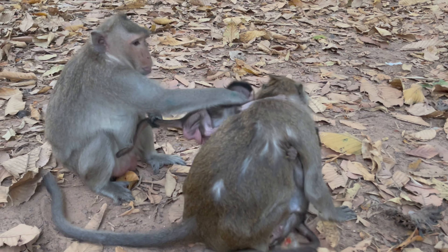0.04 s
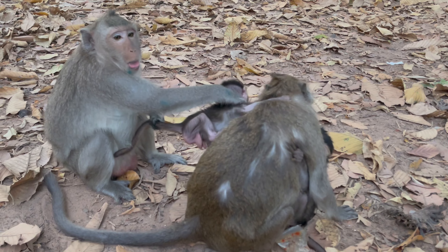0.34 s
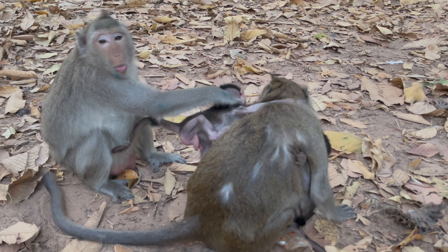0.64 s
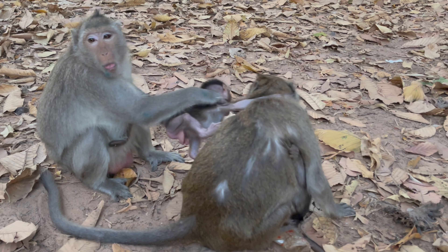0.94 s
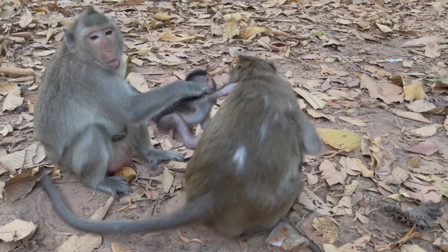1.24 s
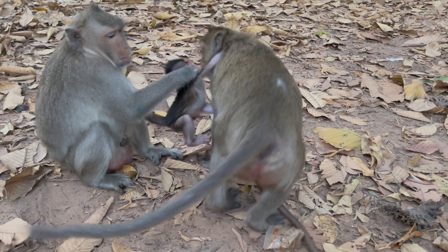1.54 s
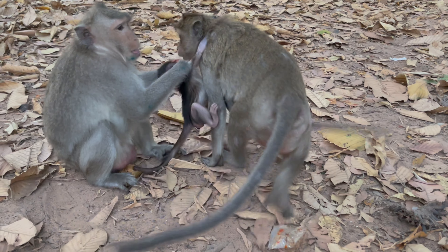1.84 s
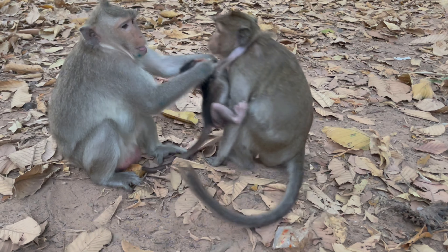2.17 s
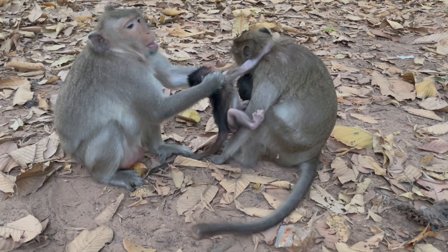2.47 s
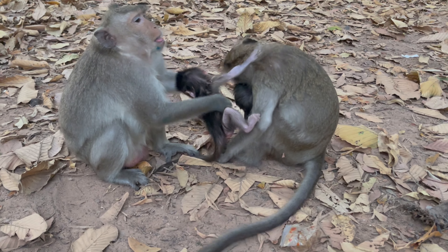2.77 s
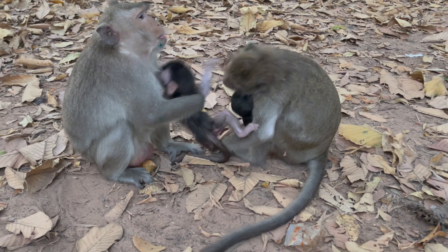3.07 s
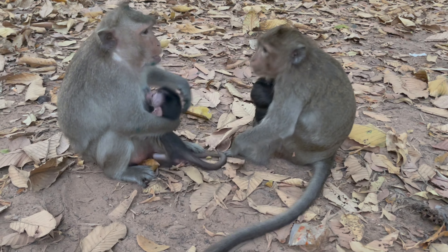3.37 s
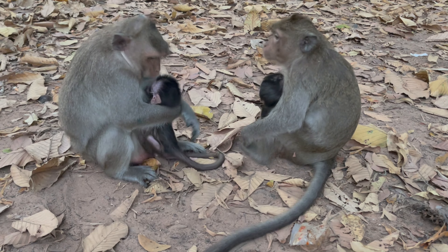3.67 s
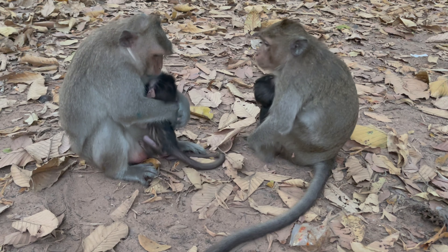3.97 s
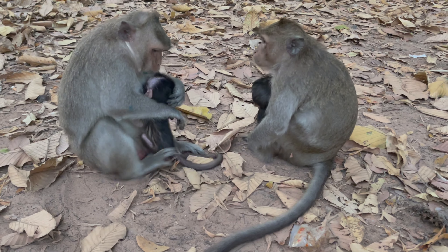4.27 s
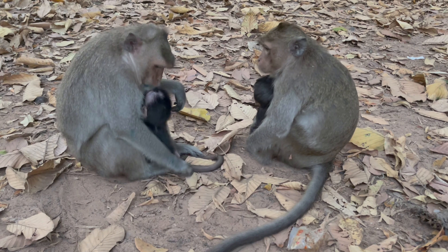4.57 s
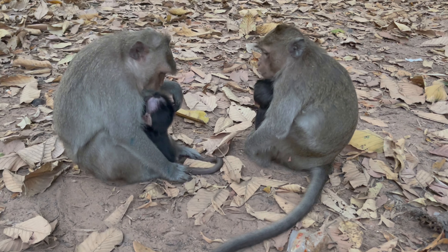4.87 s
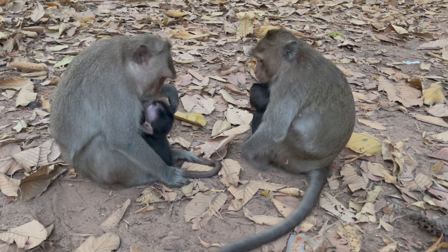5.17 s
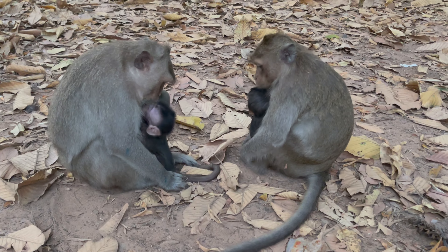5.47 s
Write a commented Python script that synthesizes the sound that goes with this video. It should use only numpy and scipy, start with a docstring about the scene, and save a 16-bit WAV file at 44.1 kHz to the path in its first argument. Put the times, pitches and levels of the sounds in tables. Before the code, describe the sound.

A high, steady whine and hiss of cicadas fills a forest throughout, over the low rumble of distant traffic. The whole scene is fairly quiet. At the very start there is one tiny grunt, then faint, far hoots. At about 1.1 seconds a monkey close by gives three soft, low, rough grunts in quick succession. Dry leaves crackle and small stalks snap under the animals from 1 to 2.2 seconds. A small bird chips a quick, high, slightly echoing trill from about 1.8 to 2.7 seconds. Another faint hoot comes near 2.9 seconds, followed by brief rustles. Short runs of stuttering, throaty grunts come at 3.3 and 3.9 seconds, then a crackle and snap at 4.3. The strongest run of grunts falls around 4.9 to 5 seconds. One last bird chip sounds near 5.7 seconds as the insects and traffic carry on.

```python
"""Macaques give short runs of low, rough, stuttering grunts, close by in a forest.
Each grunt is a few slaps of the vocal folds that ring the throat and mouth. Dry leaves crackle
under the animals, a small bird chips a high trill, and something hoots far off. All around,
cicadas click so fast that they whine, over the rumble of distant traffic."""
import sys
import numpy as np
from scipy import signal
from scipy.fft import rfft, irfft
from scipy.io import wavfile
from scipy.ndimage import uniform_filter1d

SR = 44100
rng = np.random.default_rng(int(sys.argv[2]) if len(sys.argv) > 2 else 0)


def to_wav(sig):
    """Store sig (one row per channel, or 1-D mono) as 16-bit WAV at the path in sys.argv[1].

    Samples outside -1..1 are clipped; the rate is SR.
    """
    pcm = np.clip(np.atleast_2d(sig), -1, 1) * 32767
    pcm = np.round(pcm).astype(np.int16)
    wavfile.write(sys.argv[1], SR, pcm.T)  # frames by channels


N = 252252
TIME = np.arange(N) / SR
FREQS = np.fft.rfftfreq(N, 1 / SR)

# each grunt: (time [s], length [s], level [dB], mouth ring [Hz], brightness [dB])
GRUNTS = [(0.001, 0.029, -53, 1490, -10), (1.109, .025, -47.5, 1580, -12), (1.164, 0.021, -47.5, 1660, -9),
          (1.212, 0.02, -51.5, 1745, -11), (3.329, .014, -49, 1460, -7), (3.375, 0.014, -51, 1473, -8),
          (3.414, 0.024, -45, 1620, -7), (3.454, 0.054, -42, 1560, 0), (3.9, 0.015, -45.5, 1382, -13),
          (3.94, 0.022, -40.5, 1620, -5.5), (3.979, 0.035, -40, 1680, -7), (4.029, 0.029, -42, 1570, -8.5),
          (4.055, 0.033, -46, 1550, -12), (4.868, 0.019, -53.5, 1490, -16),
          (4.909, 0.029, -39.5, 1774, -4.5), (4.954, 0.028, -38.5, 1835, -1.5),
          (5.001, .022, -41, 1870, -2.5), (5.019, 0.03, -44, 1800, -7)]


def macaques():
    """Grunts come in short runs, about twenty a second within a run."""
    track = np.zeros(N)
    for start, length, db, mouth_hz, bright_db in GRUNTS:
        add(track, start, grunt(length, db, mouth_hz, bright_db))
    return track


# where the chest and throat ring; only the balance between the rows counts:
# (frequency [Hz], width [Hz], weight [dB], extra weight [dB per dB above an average grunt])
THROAT_RINGS = [(191, 114, -1, 0.97), (312, 180, -1, 0.77), (520, 203, -1.5, 1)]


def grunt(length, db, mouth_hz, bright_db, pulse_hz=170, jitter=.14, rasp=.07, rasp_s=.0035):
    """A few uneven slaps of the vocal folds, each with a puff of rasp, ring the throat and mouth."""
    t = np.arange(int(length * SR) + SR // 50) / SR
    gap_luck, size_luck = rng.standard_normal((16, 2)).T
    gaps = np.clip(1 + jitter * gap_luck, .5, 2) / pulse_hz
    slaps = np.zeros(len(t))
    for start, size in zip(np.cumsum(gaps) - gaps[0], undb(1.5 * size_luck)):
        if start < length:
            # the push swells and eases within each grunt
            effort = size * np.sin(np.pi * (start + .003) / (length + .004)) ** .6
            puff = (t >= start) * np.exp(-abs(t - start) / rasp_s)
            slaps += effort * rasp * puff * rng.standard_normal(len(t))
            slaps[int(start * SR)] += effort
    force_db = db - np.mean(GRUNTS, axis=0)[2]
    # the low, throaty ring keeps nearly the same tone in soft and hard grunts;
    # neighbouring rings of a tube swing opposite ways
    throat = sum((-1) ** k * undb(weight + growth * force_db) * ring(slaps, hz, width)
                 for k, (hz, width, weight, growth) in enumerate(THROAT_RINGS))
    throat = signal.sosfilt(signal.butter(4, [120, 670], "bandpass", fs=SR, output="sos"), throat)
    mouth = ring_twice(slaps, mouth_hz, width=460, db=0)
    upper = ring_twice(slaps, hz=3250, width=550, db=-10)
    hiss = ring_twice(slaps, hz=6200, width=4200, db=-14)
    middle = ring_twice(slaps, hz=1130, width=340, db=-17 + 1.34 * force_db)  # heard in hard grunts
    voice = level(throat, 0) + undb(bright_db) * (mouth + upper + hiss) + middle
    return level(voice, db) * np.sqrt(len(t) / (length * SR))  # make up for the quiet tail


# movements in the fallen leaves: (middle time [s], half length [s], relative level [dB])
RUSTLES = [(1.029, 0.0086, -48), (1.21, 0.056, -54), (1.255, 0.041, -51.5), (1.47, 0.33, -58.5),
           (1.742, 0.022, -43.5), (1.838, .025, -47.5), (2.015, 0.022, -51), (2.116, 0.086, -47.5),
           (3.02, 0.016, -47), (3.227, 0.033, -48), (4.273, 0.049, -49)]
# tone of dry leaves: (frequency [Hz], relative level [dB])
LEAF_TONE = [(300, -6), (900, -6.5), (1700, -3.5), (4000, -2.5), (6500, -1), (9000, -1), (12000, -1),
             (15500, 1)]


def leaves(cracks_per_s=2200, patchy_db=2):
    """Shifting bodies crush dry leaves in uneven showers of tiny cracks."""
    motion = sum(undb(db) * np.exp(-.5 * ((TIME - middle) / half) ** 2) for middle, half, db in RUSTLES)
    cracks = (rng.random((2, N)) < cracks_per_s / SR) * rng.choice([-1, 1], (2, N))
    sizes = undb(3.5 * np.minimum(rng.exponential(size=(2, N)), 3.5))
    crackle = spread(colour(cracks * sizes, LEAF_TONE), width=.1)
    return motion * undb(patchy_db * drift(70)) * level(crackle, 2.9)


# each breaking stalk: (time [s], ring [Hz], ring width [Hz], level [dB])
SNAPS = [(1.022, 2200, 3000, -56), (1.279, 4200, 3000, -49), (1.368, 6300, 800, -47),
         (2.095, 2500, 3000, -54), (2.148, 2000, 2500, -52), (3.021, 4000, 3000, -56),
         (3.823, 3700, 1800, -58), (4.265, 3000, 500, -46.5)]


def stalks(fade_s=.002):
    """A dry stalk snaps with a tiny burst of noise that makes it ring."""
    track, t = np.zeros(N), np.arange(SR // 50) / SR
    for start, hz, width, db in SNAPS:
        crack = rng.standard_normal(len(t)) * np.exp(-t / fade_s)
        add(track, start, ring_twice(crack, hz, width, db))
    return track


# single chips around the trill: (time [s], starting pitch [Hz], level before the echo [dB])
CHIPS = [(1.818, 7400, -44), (1.907, 7260, -47), (2.628, 7140, -47), (2.705, 7140, -46), (5.690, 7100, -42)]


def bird(length=.02, fall=.118):
    """Each chip is a quick, buzzy whistle that slides down."""
    track, progress = np.zeros(N), np.linspace(0, 1, int(length * SR))
    for start, hz, db in CHIPS + trill():
        buzz = .045 * np.interp(progress, np.linspace(0, 1, 30), rng.standard_normal(30))
        pitch = hz * (1 - fall * progress + buzz)
        add(track, start, undb(db) * np.sin(np.pi * progress) * whistle(pitch))
    return track


def trill(count=11, start=1.975, gap_s=.0535, slowing_s=.00056, sink_hz_per_s=520, fade_db_per_s=1.5):
    """A quick run of chips that slows, sinks and fades a little, as rows like those of CHIPS."""
    k = np.arange(count)
    delays = gap_s * k + slowing_s * k ** 2 / 2
    return [(start + delay, 7350 - sink_hz_per_s * delay, -46.5 - fade_db_per_s * delay)
            for delay in delays]


# far hoots, the short one made of two tones:
# (time [s], length [s], top pitch [Hz], level before the echo [dB])
HOOTS = [(.155, .14, 890, -56.5), (.305, .035, 830, -58), (.305, .035, 1260, -60), (2.92, .13, 860, -64)]


def hoots(arch=.57):
    """Faint, nearly pure calls that rise a little and droop."""
    track = np.zeros(N)
    for start, length, hz, db in HOOTS:
        progress = np.linspace(0, 1, int(length * SR))
        pitch = hz * (1 - arch * (progress - .4) ** 2)
        swell = np.sqrt(abs(np.sin(np.pi * progress)))
        add(track, start, undb(db) * swell * whistle(pitch))
    return track


# strong cicada tones that swell and fade: (pitch [times the click rate], level [dB], swing [dB])
STRONG_TONES = [(5, -45, 2.5), (10, -43.5, 1.95), (15, -46.5, 2.5)]
# weaker cicada tones: (pitch [times the click rate], level [dB])
WEAK_TONES = [(4, -70), (6, -66.5), (7, -74.5), (9, -64), (11, -60), (12, -65.5), (16, -60.5), (17, -66),
              (20, -49.5), (21, -64.5)]


def near_cicadas(fades_per_s=9):
    """Cicadas click tiny drums on their bodies so fast that the clicks blend into a whine."""
    strong = [(multiple, db + swing * drift(fades_per_s)) for multiple, db, swing in STRONG_TONES]
    return chorus(strong + WEAK_TONES, click_hz=542, detune=.0043, waver=.0026, wavers_per_s=25, count=8)


# tones of the farther insects: (pitch [times the click rate], level [dB])
FAR_TONES = [(5, -50), (10, -52.5), (15, -54.5), (20, -82)]


def far_cicadas():
    """A group further off clicks more slowly and less in step, for a lower, blurred whine."""
    return chorus(FAR_TONES, click_hz=528.1, detune=.028, waver=.016, wavers_per_s=120, count=10)


def chorus(tones, click_hz, detune, waver, wavers_per_s, count):
    """Insects clicking at nearly the same rate slip in and out of step, so each tone flutters."""
    rates = [click_hz * (1 + offset + waver * drift(wavers_per_s))
             for offset in detune * np.linspace(-1, 1, count)]
    phases = 2 * np.pi * np.cumsum(rates, axis=1) / SR
    track = np.zeros(N)
    for multiple, db in tones:
        head_starts = 2 * np.pi * rng.random((count, 1))
        flutter = np.sin(multiple * phases + head_starts).sum(axis=0)
        # keep the quick flutter, but even out the strength over a tenth of a second
        track += undb(db) * flutter / np.sqrt(uniform_filter1d(flutter ** 2, SR // 10))
    return track


# tone of the insects in the treetops: (frequency [Hz], relative level [dB])
INSECT_TONE = [(1500, -26.5), (2300, 6.5), (2800, 13.5), (3600, -12), (4500, -9), (5300, 22), (6300, -1.5),
               (7200, 3.5), (8200, 15), (9200, -6.5), (10800, 17), (11800, -34), (13000, -93)]


def insect_hiss():
    """Countless remote insects merge into an even hiss."""
    noise = spread(rng.standard_normal((2, N)), width=.053)
    return level(colour(noise, INSECT_TONE), -46)


# tone of distant traffic: (frequency [Hz], relative level [dB])
TRAFFIC_TONE = [(20, -32), (35, -16), (55, 0), (85, 0), (125, -0.5), (170, -12.5), (240, -22.5), (350, -24),
                (550, -31.5), (1000, -36.5), (2200, -39.5), (4000, -41.5)]
# swell of the traffic, with one lull: (time [s], level [dB])
TRAFFIC_SWELL = [(0.1, -38.5), (0.7, -40.5), (1.5, -39.5), (2.35, -40), (2.76, -42.5), (3.05, -39.5),
                 (4.15, -39.5), (4.7, -40.5), (5.6, -40)]


def traffic(right_louder_db=.6):
    """Far roads give a slowly heaving rumble, centred in the bass and wider higher up."""
    middle, side = rng.standard_normal((2, N))
    side = irfft(rfft(side) * np.minimum(FREQS / 800, .7), N)
    rumble = colour(spread([middle, side], width=1), TRAFFIC_TONE)
    even = rumble / np.sqrt(uniform_filter1d(np.mean(rumble ** 2, axis=0), SR // 2))
    swell_db = np.interp(TIME, *np.transpose(TRAFFIC_SWELL))
    return even * undb(swell_db + right_louder_db * np.array([[-.5], [.5]]))


# tone of one vehicle: (frequency [Hz], relative level [dB])
VEHICLE_TONE = [(90, -25), (150, 5), (220, -10), (350, -7), (550, -23), (1000, -33)]


def vehicle(start_db=-51, fade_db_per_s=6):
    """The low road noise of one far vehicle fades as it draws away."""
    drone = colour(spread(rng.standard_normal((2, N)), width=.36), VEHICLE_TONE)
    return level(drone, start_db) * undb(-fade_db_per_s * TIME)


def forest_echo(x, echo_db, fade_s):
    """Trunks and leaves scatter the sound into a short tail that drops 60 dB in fade_s."""
    t = np.arange(SR // 2) / SR
    tail = rng.standard_normal((2, len(t))) * undb(-60 * t / fade_s) * (t > .004)
    tail /= np.sqrt(np.sum(tail ** 2, axis=1, keepdims=True))
    return x + undb(echo_db) * signal.fftconvolve(x[None], tail, axes=1)[:, :N]


def undb(db):
    """Turn decibels into a number to multiply by."""
    return 10 ** (np.asarray(db) / 20)


def level(x, db):
    """Set the average (rms) level of a sound."""
    return x * undb(db) / np.sqrt(np.mean(x ** 2) + 1e-20)


def add(track, start_s, x):
    """Mix a sound into a track at the given time."""
    start = max(int(start_s * SR), 0)
    part = x[:max(N - start, 0)]
    track[start:start + len(part)] += part


def colour(x, points):
    """Shape the lows and highs along a curve of (frequency [Hz], level [dB]) points."""
    hz, db = np.transpose(points)
    return irfft(rfft(x) * undb(np.interp(np.log(FREQS + 1), np.log(hz), db)), N)


def ring(x, hz, width):
    """Let a sound ring in one band of frequencies, width Hz wide."""
    return signal.lfilter(*signal.iirpeak(hz, hz / width, fs=SR), x)


def ring_twice(x, hz, width, db):
    """Ring twice for a sharper band, then set the level."""
    return level(ring(ring(x, hz, width), hz, width), db)


def whistle(pitch_hz):
    """A pure tone that follows a changing pitch."""
    return np.sin(2 * np.pi * np.cumsum(pitch_hz) / SR)


def drift(rate):
    """A random wander, about 1 in size, that heads for a new value rate times a second."""
    targets = rng.standard_normal(int(N / SR * rate) + 3)
    return 1.2 * np.interp(TIME * rate + rng.random(), np.arange(len(targets)), targets)


def spread(x, width):
    """Put x[0] in the middle and use x[1] to widen it to left and right."""
    return x[0] + width * x[1] * np.array([[1], [-1]])


def scene():
    """Grunts and rustles close by, insects and a bird in the trees, traffic beyond."""
    hiss = insect_hiss()
    grunts = forest_echo(macaques(), echo_db=-16, fade_s=.15)
    chips = forest_echo(bird(), echo_db=7, fade_s=.37)
    calls = forest_echo(hoots(), echo_db=-7, fade_s=.3)
    ground = leaves() + stalks()
    insects = near_cicadas() + far_cicadas() + hiss
    return grunts + ground + chips + calls + insects + traffic() + vehicle()


# how far the wave at the left microphone runs ahead of the right: (frequency [Hz], lead [radians])
LEFT_LEAD = [(0, 0), (780, 0.2), (2240, 0.1), (3190, 0.7), (3620, 0.2), (4480, 0.1), (4910, 0.6),
             (7060, -0.1), (8180, 0.6), (8870, -0.2), (9130, -1.3), (10900, -4.3), (11700, -6.2),
             (12300, -6.3)]


def record(dry, top_hz=12300):
    """The two microphones are out of step, most of all in the treble; the highest sounds are cut."""
    lead = np.interp(FREQS, *np.transpose(LEFT_LEAD))
    right = irfft(rfft(dry[1]) * np.exp(-1j * lead), N)
    low_pass = signal.ellip(8, .2, 70, top_hz, fs=SR, output="sos")
    return signal.sosfilt(low_pass, np.array([dry[0], right]))


dry = scene()
out = record(dry)
to_wav(out)
```